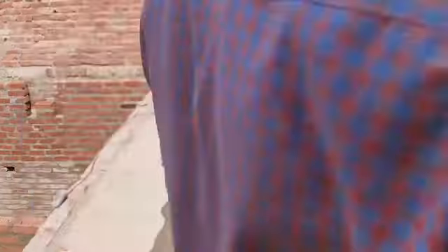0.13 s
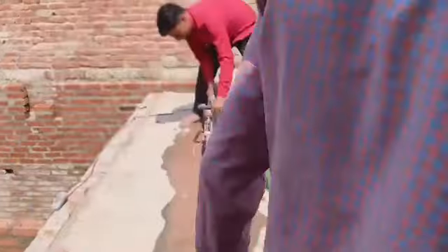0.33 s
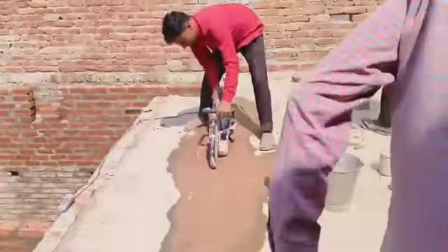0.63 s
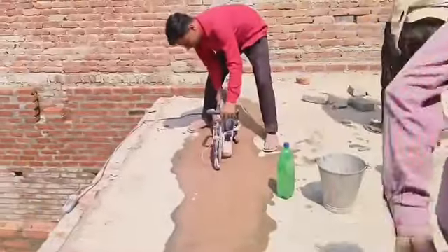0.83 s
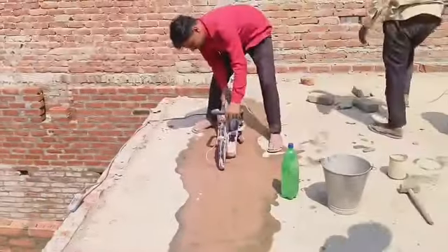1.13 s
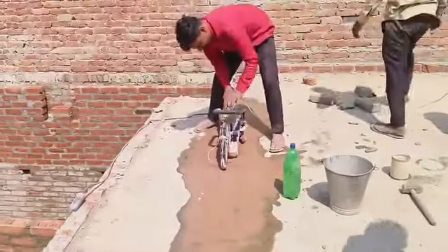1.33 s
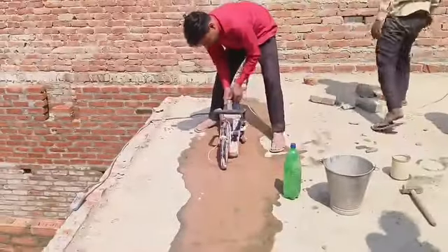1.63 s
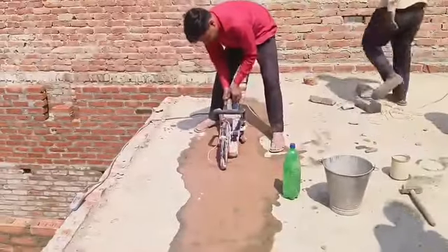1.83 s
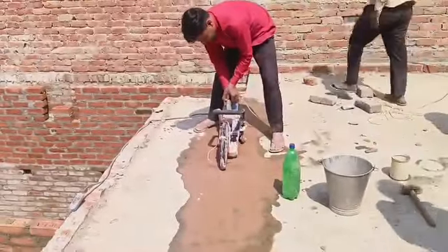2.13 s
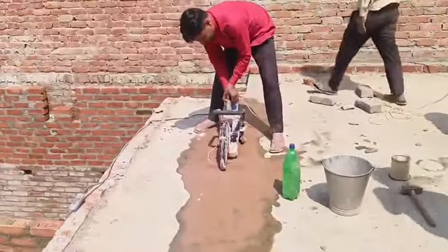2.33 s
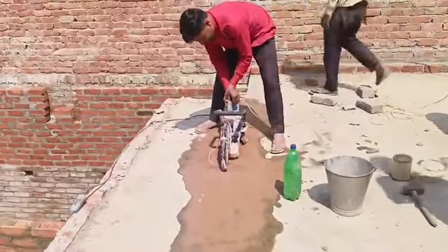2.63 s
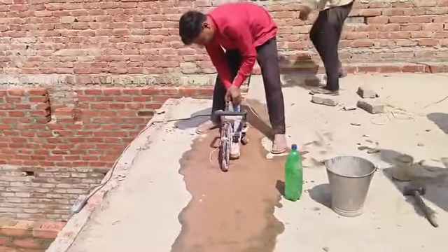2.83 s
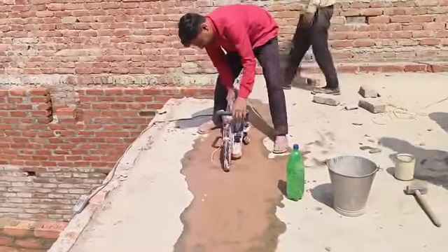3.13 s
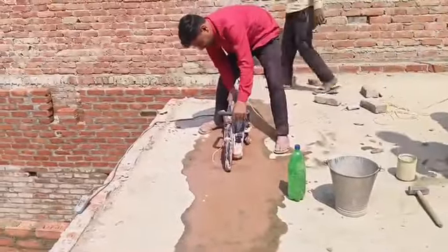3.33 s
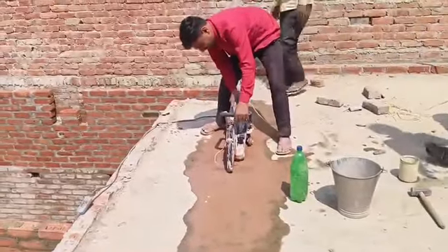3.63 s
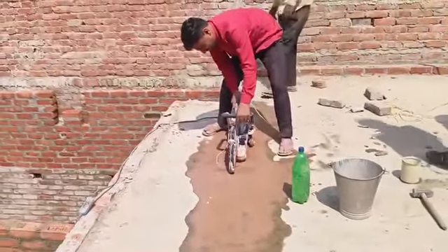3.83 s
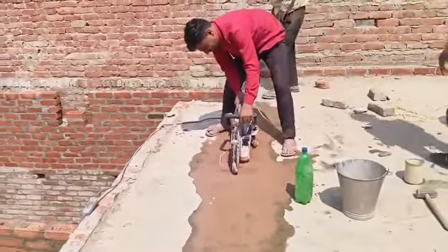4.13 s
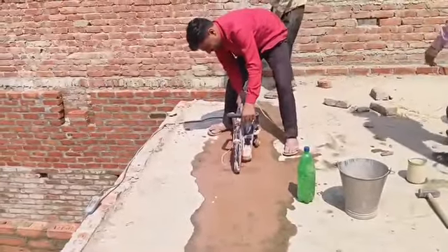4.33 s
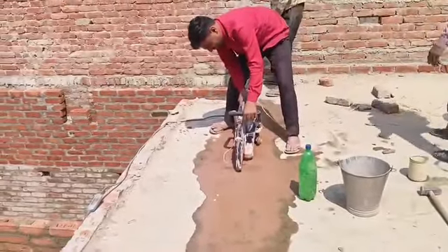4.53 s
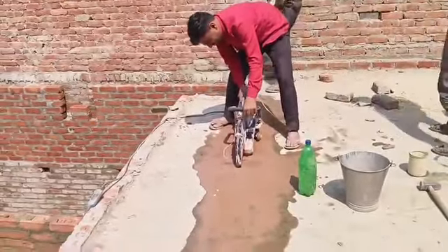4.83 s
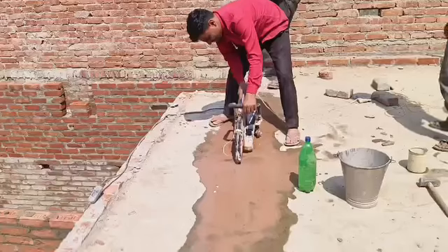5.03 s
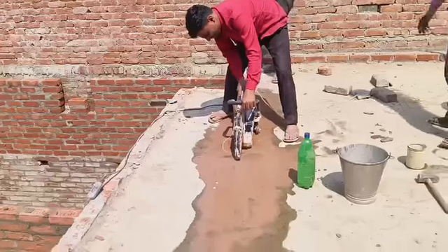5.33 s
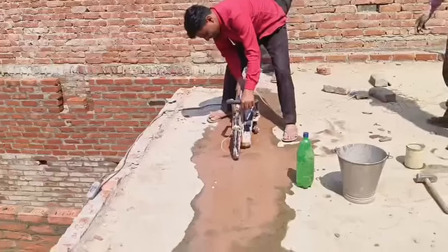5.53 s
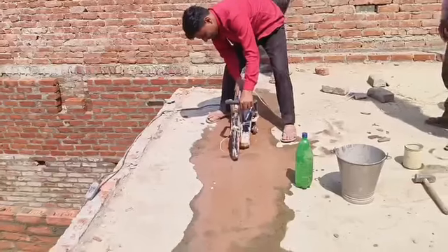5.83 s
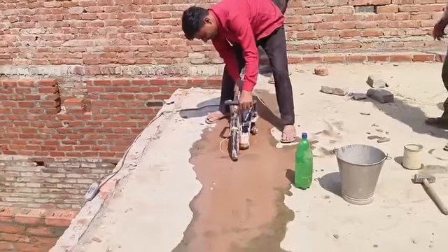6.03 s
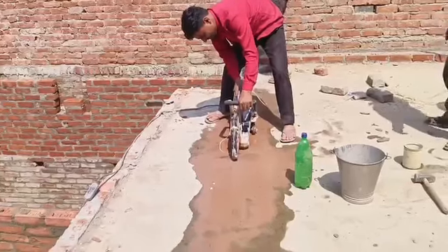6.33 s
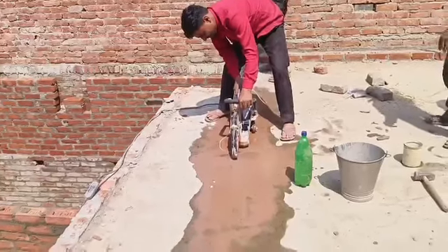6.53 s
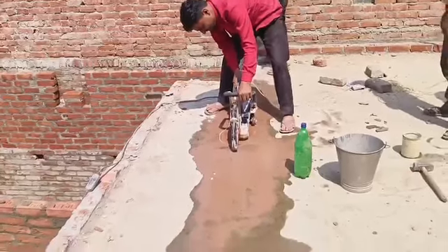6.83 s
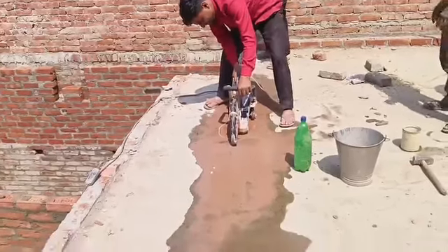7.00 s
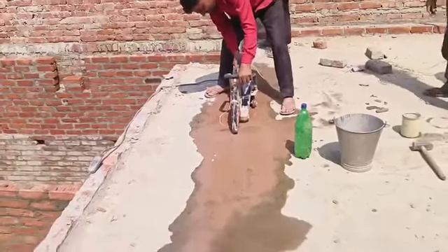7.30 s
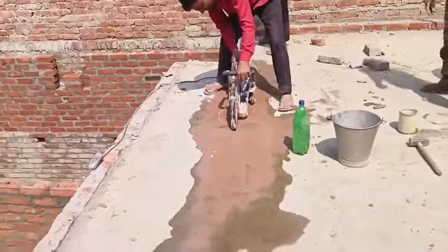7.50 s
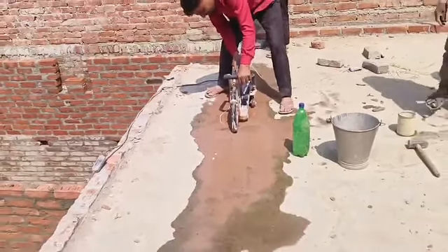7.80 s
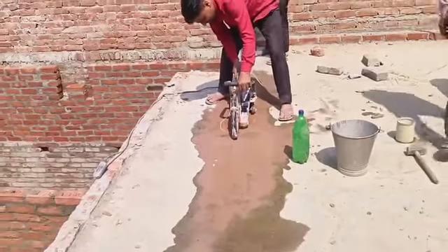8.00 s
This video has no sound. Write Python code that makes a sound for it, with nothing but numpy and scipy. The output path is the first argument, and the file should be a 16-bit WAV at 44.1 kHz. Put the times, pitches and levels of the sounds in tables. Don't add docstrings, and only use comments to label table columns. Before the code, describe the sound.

On an open rooftop, an electric saw grinds concrete, first softly with thin gear whine, then harshly with rattling bites and hollow slab booms.

```python
import sys
import numpy as np
from scipy import signal
from scipy.fft import rfft, irfft
from scipy.io import wavfile
from scipy.ndimage import uniform_filter1d

SR = 44100
rng = np.random.default_rng(int(sys.argv[2]) if len(sys.argv) > 2 else 0)


def transcribe(signal):
    frames = np.atleast_2d(signal).T
    limited = np.clip(frames, -1, 1)
    pcm = np.round(limited * 32767).astype(np.int16)
    wavfile.write(sys.argv[1], SR, pcm)


def voltage_ratio(level):
    return 10 ** (np.asarray(level, float) / 20)


N = 359856
HZ = np.fft.rfftfreq(N, 1 / SR)

# time_s, pressure_db (against a full cut), seat_db (blade in the groove)
FEED = [(0, -6, -4.5), (.32, -11.5, 11.5), (.7, -12, 1.5), (.93, 1, -2.5), (1.03, 0.5, 0), (1.12, -6, -1.5),
        (1.3, -4.5, -7.5), (2.07, -8, -5), (3.25, -8.5, -5.5), (3.47, -7.5, -3), (3.54, 3.5, -11.5),
        (3.8, 3, -5), (3.95, 0.5, -6), (5.0, 2, -2.5), (5.3, -0.1, 1.5), (6.2, -0.5, -2.5),
        (7.3, -0.5, 0.5), (8.16, -0.5, -1)]
# time_s, pressure_change_db, length_s
JOLTS = [(.255, 0.5, 0.079), (.327, -2, 0.043), (1.578, -1.5, 0.094), (1.74, 1.5, 0.037), (1.97, 1, 0.068),
         (2.347, -1, .08), (2.526, 3.5, 0.15), (2.576, -2.5, 0.13), (2.75, 2.5, 0.086), (3.115, 2, 0.077),
         (3.37, 0.5, 0.14), (4.165, 0.5, 0.066), (4.54, -2, 0.019), (5.262, 2, 0.062), (5.49, -2, 0.12),
         (5.591, 1, 0.034), (5.907, -1, 0.028), (6.002, 3, 0.032), (6.092, 0, 0.026), (6.31, -3.5, 0.032),
         (6.36, 3, 0.16), (6.469, 3, 0.04), (6.663, 0.5, 0.032), (6.807, 1.5, 0.14), (7.01, -4.5, 0.029),
         (7.22, 1.5, 0.053), (7.607, -1, 0.026), (7.934, 0, 0.045), (8.054, -0.5, 0.034), (8.102, 3, 0.02)]
# full_cut_level_db, db_per_pressure_db, db_per_seat_db, deep_groove_db_per_s
PARTS = [
    (-36, 0.99, 0.89, 0.8),
    (-38, 0.77, 0.52, 0),
    (-34.5, 0.66, 0.1454, 0.7),
    (-29, 0.9658, 0.24, 0.04),
]
PART_EDGES_HZ = (500, 1450, 3450)
DEEP_FROM_S = 5.5

# pitch_hz, level_db (per Hz)
GRIT_COLOUR = [(18, -63), (30, -20), (168, -21.5), (372, -7), (493, -17.5), (667, -7.5), (1220, -9.5),
               (1470, -7.5), (1580, -10.5), (1860, -11.5), (2830, -10), (3040, -10), (4840, -1.5),
               (7200, -6), (7900, -6), (10300, -19), (17400, -120)]
# pitch_hz, width_hz, level_db
RINGS = [(380.5, 60, -8.5), (665.5, 32, -2), (934, 125, -6.5), (1910, 57, -18), (2286, 270, -14),
         (3070, 270, -32.5), (4015, 43, -7), (4280, 99, -7), (4800, 67, -11), (5870, 200, -7.5),
         (6930, 70, -7)]
# time_s, peak_db
BITES = [(0.839, -28), (0.856, -18), (0.8829, -19), (0.9507, -20), (1.731, -20), (1.9605, -19),
         (3.5144, -23), (3.5374, -23), (3.5534, -12), (3.5977, -17), (3.6411, -19), (3.7309, -27),
         (3.7604, -11), (3.8482, -23), (3.8751, -12), (3.922, -22), (4.1599, -11), (4.2048, -13.5),
         (4.354, -14), (4.4014, -34), (4.4568, -10.5), (4.5545, -28), (4.6224, -14), (4.6583, -14),
         (4.8668, -44), (4.9033, -26), (4.9696, -30), (4.9896, -25), (5.2574, -17), (5.583, -15),
         (5.8277, -18), (5.8785, -15), (5.9239, -21), (5.9394, -13.5), (6.0013, -16), (6.043, -21),
         (6.0596, -15), (6.19, -16.5), (6.34, -21), (6.4617, -14), (6.552, -16), (6.6059, -14),
         (6.6313, -18), (6.7092, -15), (6.7511, -15), (6.8034, -15), (7.1177, -15), (7.1856, -19),
         (7.2125, -16), (7.3033, -21), (7.3602, -36), (7.463, -14), (7.5443, -20), (7.6256, -15),
         (7.6625, -15.5), (7.7004, -12), (7.7997, -14), (7.8446, -14.5), (7.9059, -21), (7.931, -14)]
BITE_OVER_DB, BITE_RISE_S, BITE_FALL_S = -22.5, 0.001, 0.0029

# pitch_hz, side_minus_mid_db
WIDTH = [(60, -82), (110, -17), (200, -30), (380, -3), (700, -1.5), (1290, -2), (2380, 0.5), (4400, -1.5),
         (8120, -2), (15000, -3)]
# pitch_hz, left_minus_right_db
LEAN = [(200, 2), (380, -4), (520, -11), (1300, -6.5), (2300, -3.5), (3200, 0), (4000, 3), (4900, -4.5),
        (6500, 1.5), (7700, 1.5)]
# time_s, length_s, left_minus_right_db
PASSERS = [
    (.13, 0.31, -2),
    (.66, 0.33, 4),
    (2.2, 0.55, 0.5),
    (3.2, 0.41, -0.5),
]
LEAN_DB = -1.27

# pitch_hz, gain_db
TOP_GAIN = [(7800, -10), (9000, -8.5), (9400, -7), (10500, -8.5), (12000, -11), (13500, -5), (15000, -9),
            (15800, -12)]
SHIFT_HZ, CORE_TOP_HZ, TOP_HZ = 7580, 7800, 15880
TOP_CHATTER_DB, TOP_BITE = 0.5, 0.15

# pitch_hz, width_hz, depth (0 to 1)
NOTCHES = [(518, 130, 0.2), (1455, 130, 0.95), (2840, 90, 0.82), (5390, 120, .7), (5620, 120, .75),
           (2060, 60, 0.45), (3420, 90, 0.55), (1700, 60, .55), (2600, 90, .5), (3680, 100, .55),
           (4510, 70, .55), (6100, 80, .5), (6620, 90, .45), (4300, 60, .35), (4950, 70, .35),
           (3185, 50, .45)]
NOTCH_WANDER = .005
# start_s, length_s,
# first_hz, last_hz, level_db
SHADOWS = [(.25, 0.28, 3200, 3200, -10), (0.15, 0.73, 5100, 4600, 3), (1.1, 0.66, 2400, 2700, -1),
           (2.5, 0.69, 3700, 3580, 1), (2.9, 0.41, 3440, 3100, -23), (4.2, .22, 3300, 3370, -19),
           (4.66, .3, 3300, 3030, -19), (1.74, .16, 2700, 2700, -10), (0.24, .3, 1900, 1780, -15),
           (3.703, 0.25, 2050, 2180, -26), (5.24, 0.86, 2720, 2750, -7), (5.4, 0.77, 2040, 2000, -3.5),
           (5.7, 0.98, 5460, 5800, -3.5), (5.9, 0.36, 2820, 2790, -12), (6.8, 1.6, 2870, 2800, -8),
           (6.95, .2, 2500, 2450, -17), (7.3, 0.51, 3800, 3780, -3), (7.65, 0.54, 4330, 4350, -3),
           (0.83, 0.11, 4520, 4300, -7), (3.6, 0.55, 2750, 2750, -7), (7.23, 1.7, 2300, 2150, -37),
           (7.2, 0.98, 3030, 2900, -6), (7.3, 0.83, 3900, 3600, -3), (7.35, 1.2, 1290, 1350, -13)]
SHADOW_WIDTH = 0.043
# start_s, length_s, pitch_hz, width_hz, level_db
SWELLS = [(0, 1.14, 4000, 820, 5.5), (1, 1.6, 2470, 150, 3.5), (1.07, 1.18, 3520, 604, 6.5),
          (2, 0.34, 6300, 1300, 2.5), (3.5, .6, 4600, 840, 1), (3.5, 1.1, 6300, 120, 3.5),
          (0, 1.7, 4900, 110, 0), (5.5, 1.9, 3255, 59, 6.5), (5, 2.2, 3118, 56, 4.5),
          (2.15, 1.53, 390, 40, 4.5), (1.5, 1.8, 662, 74, -4.5), (1.5, 0.31, 662, 68, -4),
          (1.7, 0.4, 450, 100, -7), (3, .9, 3340, 570, -4), (2.5, 0.73, 3150, 550, 4.5),
          (7, 1, 730, 170, 3.5), (0.8, .26, 2500, 500, 3.5), (0.8, .24, 800, 350, 3),
          (0.7, .25, 4000, 500, -2), (6, .6, 267, 100, 4.5), (4, 0.3, 3900, 1400, -2),
          (6, 1.13, 4700, 300, 3.5), (7., 1.05, 6200, 600, 2.5), (3.5, 0.14, 420, 130, 5),
          (3.49, 0.053, 1100, 2000, -4), (3.58, 0.056, 700, 900, 2), (3.62, 0.053, 350, 200, 5.5),
          (5.5, 0.18, 350, 110, 1), (7, 0.43, 330, 89, 5.5), (6.5, 1, 270, 100, -5)]
# lag_s, share (of the direct sound)
WALLS = [(.0061, .05), (.0097, .07), (.0143, .08), (.0217, .08)]
SCATTER, SCATTER_FROM_HZ = 1.6, 1300
PATCH_BINS, PATCH_FRAMES = 2, 7
DIP_BELOW, DIP_STEEP = .8, 2.2

# time_s, peak_db, pitch_hz
BOOMS = [(0.123, -34, 364), (0.187, -37, 404), (0.25, -40, 385), (0.296, -31, 344), (0.34, -33, 388),
         (0.483, -34, 351), (0.555, -38, 340), (0.672, -30.5, 372), (0.752, -29.5, 378),
         (0.83, -34, 384), (0.984, -35, 393), (1.04, -39, 299), (1.119, -36, 380),
         (3.639, -28, 377), (3.774, -30, 387), (3.811, -30, 375), (3.919, -33.5, 372),
              (4.053, -27, 380), (4.148, -32, 397), (4.286, -30, 294), (4.352, -30.5, 398),
              (4.394, -25, 368), (4.53, -30.5, 391), (4.609, -32.5, 350), (4.666, -25, 377),
              (4.709, -27.5, 370), (4.753, -29, 341), (4.813, -32, 377), (4.858, -36, 392),
              (4.893, -33, 370), (4.942, -25.5, 375), (5.011, -27, 329), (5.081, -43, 345),
              (5.129, -29, 377), (5.192, -27, 384), (5.229, -24.5, 401), (5.266, -21.5, 381),
              (5.354, -20, 378), (5.418, -24, 372), (5.5, -36, 382), (5.582, -22.5, 362),
              (5.713, -25.5, 325), (5.803, -25.5, 377), (5.858, -34, 396), (5.893, -30.5, 393),
              (6.023, -25.5, 395), (6.15, -35, 301), (6.188, -31, 392), (6.281, -26, 377),
              (6.326, -30, 389), (6.365, -30, 365), (6.436, -31, 324), (6.485, -31, 383),
              (6.541, -26.5, 365), (6.666, -28, 364), (6.77, -26, 374), (6.869, -33, 356),
              (6.919, -27, 307), (6.997, -31.5, 385), (7.047, -27.5, 393), (7.103, -25.5, 396),
              (7.204, -22.5, 376), (7.452, -24, 355), (7.502, -26, 381), (7.624, -30, 399),
              (7.658, -28, 365), (7.78, -22, 385), (7.871, -24, 370), (7.933, -29, 362), (7.971, -27, 366),
              (8.096, -25, 393)]
BOOM_DB, BOOM_RISE_S, BOOM_FALL_S = -3.5, 0.0056, .022
BOOM_LEAN_DB, BOOM_LAG = 4, .25

# start_s, length_s, first_hz, last_hz, level_db
WHINES = [(0, .3, 4250, 4245, -45), (.39, .18, 4232, 4248, -35), (.57, .13, 4255, 4255, -38),
          (.71, .12, 4214, 4205, -32.5), (.81, .08, 4200, 4160, -39), (1.22, .36, 3325, 3265, -37.5),
          (1.56, .36, 3270, 3280, -46), (1.9, .54, 3290, 3228, -40.5), (2.0, .43, 3185, 3075, -41),
          (2.02, .26, 3050, 3010, -49), (2.26, .24, 2975, 2935, -37), (2.5, .28, 2945, 2932, -40.5),
          (2.77, .1, 2920, 2915, -46)]
WHINE_RISE_S, WHINE_FALL_S = .09, .07
WHINE_EDGE_DB, WHINE_SWELL_DB, SWOOP_HZ = -8, 2, 8
HALO_DB = -6.5
# time_s, pitch_hz, level_db
WHISTLE = [(2.89, 2755, -48), (3.0, 2742, -38), (3.24, 2716, -36), (3.52, 2734, -36), (3.6, 2738, -40),
           (3.66, 2738, -48)]
# time_s, pitch_hz, level_db
GROWL = [
    (6.95, 665, -59),
    (7.35, 663, -44),
    (7.8, 668.3, -41.5),
    (8.2, 672, -42),
]
# time_s, pitch_hz, level_db
SHAFT = [(0, 350.5, -44), (.8, 350, -48), (1.15, 309, -48), (2.15, 278, -50), (2.4, 263, -62),
         (2.85, 251, -57), (3.1, 246, -53), (3.5, 248, -56)]
SHAFT_OCTAVE_DB = -14
# time_s, pitch_hz, level_db
IDLER = [(.45, 132, -64), (.6, 133, -58), (.9, 130, -59), (1.02, 127, -64)]

# pitch_hz, level_db (per Hz)
DEEP_RUMBLE = [(20, -30), (40, -11), (50, 6.5), (70, -6), (92, 7.5), (130, -30), (200, 4.5), (400, -24)]
DEEP_RUMBLE_DB = -55
THUD_PER_DB = 1.1

MUTE_UNDER_DB, MUTE_DB, MUTE_FROM_HZ = -5.6, -15, 1200


def blade():
    scrape, other = rng.standard_normal((2, N))
    mid, side = rfft(paths(np.array([scrape, 0.82 * scrape + 0.5 * other])))
    side = side * voltage_ratio(over_hz(WIDTH))
    ports = np.array([mid + side, mid - side])
    ports = ports * body() * walls() * voltage_ratio(np.outer([.5, -.5], over_hz(LEAN)))
    rises = [1] + [smooth_rise(edge) for edge in PART_EDGES_HZ] + [0]
    chatter = walk(22)
    chatter = chatter - uniform_filter1d(chatter, size=SR // 10)
    bites = grit(bites_a_second=36, spread_db=8.5, share=0.74)
    deep_s = np.maximum(np.arange(N) / SR - DEEP_FROM_S, 0)
    feed = [np.ones(N), pressure_db(), along(FEED, column=2), deep_s]
    shakes = [(.4, 0.61, 0.037), (.5, 1, 0.34), (.5, 0.12, 0.41), (2.2, 0.093, 0.91)]
    out = 0
    for k, (shared_db, own_db, bite) in enumerate(shakes):
        part = irfft(ports * (rises[k] - rises[k + 1]), N)
        level_db = np.dot(PARTS[k], feed) + shared_db * chatter + own_db * walk(30)
        out = out + part / np.std(part.mean(axis=0)) * voltage_ratio(level_db) * bites ** bite
    lean_db = LEAN_DB + bumps(PASSERS, length=1, size=2)
    leaning = out * voltage_ratio(np.outer([.5, -.5], lean_db))
    return top_octave(leaning, voltage_ratio(TOP_CHATTER_DB * chatter) * bites ** TOP_BITE)


def grit(bites_a_second, spread_db, share):
    small_db = spread_db * np.minimum(rng.exponential(size=N), 1)
    bites = share * (rng.random(N) < bites_a_second / SR) * voltage_ratio(small_db)
    s, db = np.array(BITES).T
    over_db = db - np.interp(s, np.arange(N) / SR, pressure_db()) - BITE_OVER_DB
    bites[(s * SR).astype(int)] += voltage_ratio(over_db) ** 2
    for lasts_s in (BITE_RISE_S, BITE_FALL_S):
        bites = signal.lfilter([1], [1, -np.exp(-1 / (lasts_s * SR))], bites)
    return np.sqrt(1 + bites / (BITE_RISE_S * SR))


def pressure_db():
    return along(FEED, column=1) + bumps(JOLTS, length=2, size=1)


def body():
    power = voltage_ratio(over_hz(GRIT_COLOUR)) ** 2
    for hz, width, db in RINGS:
        power = power + voltage_ratio(db + 1.5) ** 2 / (1 + (2 * (HZ - hz) / width) ** 2) ** 2
    return np.sqrt(power) * smooth_rise(47.0, slope=0.41)


def top_octave(x, shake):
    full = rfft(x)
    flat = full / np.sqrt(uniform_filter1d(np.abs(full) ** 2, size=6000) + 1e-9) ** 0.59
    moved = np.roll(flat, int(SHIFT_HZ * N / SR), axis=1)
    cross = smooth_rise(CORE_TOP_HZ, slope=0.029)
    hiss = rfft(voltage_ratio(PARTS[3][0] + pressure_db() - 6) * rng.standard_normal((2, N)))
    top = moved * voltage_ratio(over_hz(TOP_GAIN) + 15) + hiss * voltage_ratio(-8)
    top = top * (1 - smooth_rise(TOP_HZ, slope=.001))
    return irfft(full * (1 - cross), N) + shake * irfft(top * cross, N)


def paths(x):
    hz, t, cells = signal.stft(x, SR, window="cosine", nperseg=1024)
    field = rng.standard_normal((2, *cells.shape))
    field = uniform_filter1d(field, PATCH_BINS, axis=2)
    for _ in range(2):
        field = uniform_filter1d(field, PATCH_FRAMES, axis=3)
    share = SCATTER * np.clip(hz / SCATTER_FROM_HZ - .6, 0, 1)[:, None]
    scattered = (field[0] + 1j * field[1]) / np.std(field) / np.sqrt(2)
    gain = (1 + share * scattered) / np.sqrt(1 + share ** 2)
    gain = gain / np.abs(gain) * np.minimum(np.abs(gain[0]) / DIP_BELOW, 1) ** DIP_STEEP
    at = np.minimum((t * SR).astype(int), N - 1)
    for centre, width, depth in NOTCHES:
        off = hz[:, None] - centre * (1 + NOTCH_WANDER * walk(3.23)[at])
        depth_now = np.clip(depth + depth * (1 - depth) * walk(7)[at], 0, .99)
        gain = gain * (1 - depth_now / (1 + (2 * off / width) ** 4))
    change_db = 0
    for start, length, first_hz, last_hz, db in SHADOWS:
        slide_hz = np.interp(t, [start, start + length], [first_hz, last_hz])
        change_db = change_db + db * patch(hz, t, start, length, slide_hz, SHADOW_WIDTH * first_hz)
    for start, length, centre_hz, width, db in SWELLS:
        change_db = change_db + db * patch(hz, t, start, length, centre_hz, width)
    return signal.istft(cells * gain * voltage_ratio(change_db), SR, window="cosine", nperseg=1024)[1][:, :N]


def patch(hz, t, start, length, centre_hz, width):
    in_time = 1 / (1 + (2 * (t - start) / length - 1) ** 6)
    return in_time / (1 + (2 * (hz[:, None] - centre_hz) / width) ** 4)


def walls():
    echoes = sum(share * np.exp(-2j * np.pi * HZ * lag) for lag, share in WALLS)
    return 1 + smooth_rise(1400.0, slope=0.39) * echoes


def booms():
    rows = np.array(BOOMS)
    t, out = np.arange(SR // 4) / SR, np.zeros((2, N + SR))
    swell = (1 - np.exp(-t / BOOM_RISE_S)) ** 2 * np.exp(-t / BOOM_FALL_S)
    ports = np.array([[.5], [-.5]])
    for (s, db, hz), turn in zip(rows, rng.random((len(rows), 1))):
        ring = np.sin(2 * np.pi * (hz * t + turn) + 2 * BOOM_LAG * ports)
        ring = ring * voltage_ratio(db + BOOM_DB + BOOM_LEAN_DB * ports)
        first = int(s * SR)
        out[:, first:first + len(t)] += ring * swell / swell.max()
    return out[:, :N]


def whine(wobble_hz, flutter_db):
    return sum(spinning_tone(gear_line(*row), wobble_hz, flutter_db, lag=.7) for row in WHINES)


def gear_line(start, length, first_hz, last_hz, db):
    rise_end = min(WHINE_RISE_S, length / 3)
    fall_start = max(length - WHINE_FALL_S, length * 2 / 3)
    at = np.array([0, rise_end, fall_start, length])
    hz = first_hz + (last_hz - first_hz) * at / length + SWOOP_HZ * (at == 0)
    db = db + WHINE_EDGE_DB * np.array([1, 0, 0, 1]) + WHINE_SWELL_DB * (at / length - .5)
    return list(zip(start + at, hz, db))


def spinning_tone(table, wobble_hz, flutter_db, lag, partial_db=-60):
    hz = along(table, 1) + wobble_hz * walk(150)
    phase = np.cumsum(2 * np.pi * hz / SR)
    t = np.arange(N) / SR
    fade = np.clip(np.minimum(t - table[0][0], table[-1][0] - t) / 0.0051, 0, 1)
    size = np.sqrt(2) * fade * voltage_ratio(along(table, 2) + flutter_db * walk(55))
    ports = phase + np.array([[lag], [-lag]])
    return size * (np.sin(ports) + voltage_ratio(partial_db) * np.sin(2 * ports)) / np.cos(lag)


def deep_rumble():
    rumble = irfft(rfft(rng.standard_normal(N)) * voltage_ratio(over_hz(DEEP_RUMBLE)) * (HZ < 500), N)
    level_db = DEEP_RUMBLE_DB + THUD_PER_DB * along(FEED, column=1) + 2.3 * walk(1.0)
    return rumble / np.std(rumble) * voltage_ratio(level_db)


def along(table, column):
    rows = np.array(table)
    return np.interp(np.arange(N) / SR, rows[:, 0], rows[:, column])


def over_hz(table):
    rows = np.array(table)
    return np.interp(np.log(HZ + 1), np.log(rows[:, 0]), rows[:, 1])


def bumps(table, length, size):
    t = np.arange(N) / SR
    return sum(row[size] * np.exp(-np.minimum((2 * (t - row[0]) / row[length]) ** 2, 40)) for row in table)


def walk(rate):
    count = int(N / SR * rate) + 2
    held = np.repeat(rng.standard_normal(count), repeats=8)
    smooth = uniform_filter1d(uniform_filter1d(held, size=8), size=8)
    return np.interp(np.arange(N) * rate * 8 / SR, np.arange(len(smooth)), smooth / np.std(smooth))


def smooth_rise(edge_hz, slope=0.14):
    return .5 + .5 * np.tanh(np.log((HZ + 1) / edge_hz) / slope)


def scene():
    saw = blade() + booms()
    gears = whine(wobble_hz=10, flutter_db=2.8)
    halo = whine(wobble_hz=170, flutter_db=1.5) * voltage_ratio(HALO_DB)
    whistle = spinning_tone(WHISTLE, wobble_hz=5.7, flutter_db=1.2, lag=1.0)
    growl = spinning_tone(GROWL, wobble_hz=25.1, flutter_db=4.0, lag=0.46)
    hum = spinning_tone(SHAFT, wobble_hz=3.8, flutter_db=2.0, lag=0.024, partial_db=SHAFT_OCTAVE_DB)
    idle = spinning_tone(IDLER, wobble_hz=1.4, flutter_db=3.0, lag=.05)
    return saw + gears + halo + whistle + growl + hum + idle + deep_rumble()


def squelch(x):
    hz, t, cells = signal.stft(x, SR, window="cosine", nperseg=1024)
    power = np.abs(cells.mean(axis=0)) ** 2
    near = uniform_filter1d(uniform_filter1d(power, size=2, axis=0), size=5, axis=1)
    around = np.exp(uniform_filter1d(np.log(near + 1e-20), size=30, axis=0))
    weak = (near < around * voltage_ratio(MUTE_UNDER_DB) ** 2) & (hz[:, None] > MUTE_FROM_HZ)
    gain = np.where(weak, voltage_ratio(MUTE_DB), 1)
    return signal.istft(cells * gain, SR, window="cosine", nperseg=1024)[1][:, :N]


def low_pass(x):
    return signal.sosfilt(signal.butter(12, 15890, fs=SR, output="sos"), x)


def record(dry):
    limited = np.tanh(1.664 * dry) / 1.56
    finished = squelch(limited)
    return low_pass(finished)


dry = scene()
out = record(dry)
transcribe(out)
```